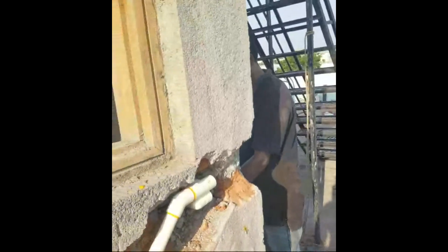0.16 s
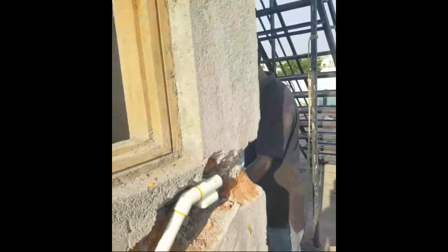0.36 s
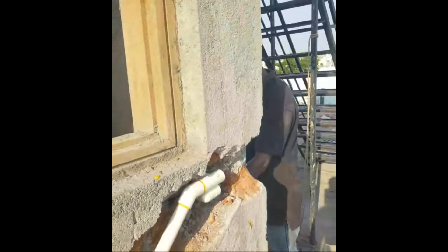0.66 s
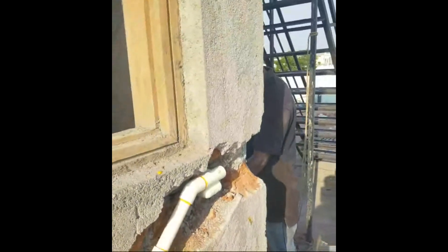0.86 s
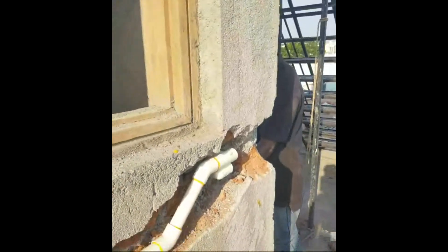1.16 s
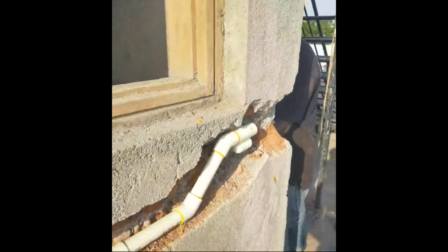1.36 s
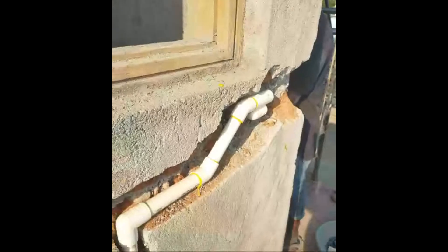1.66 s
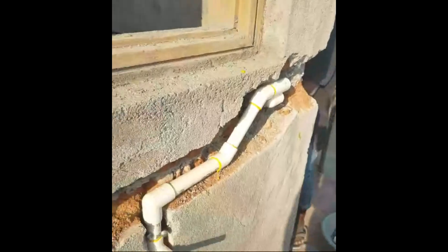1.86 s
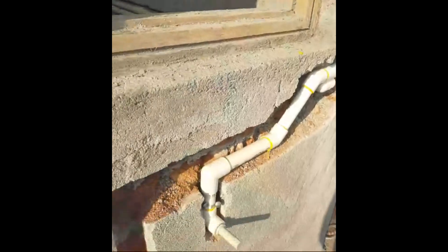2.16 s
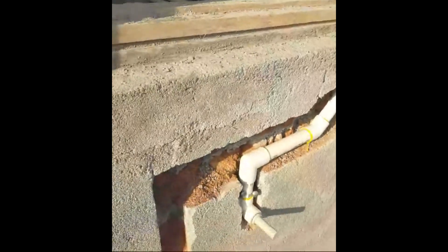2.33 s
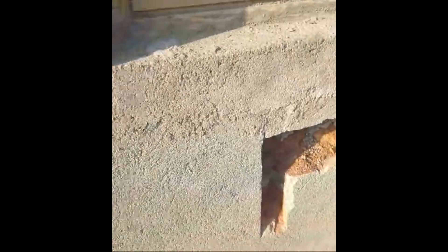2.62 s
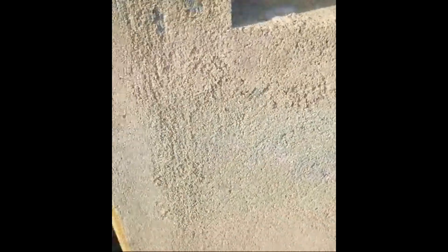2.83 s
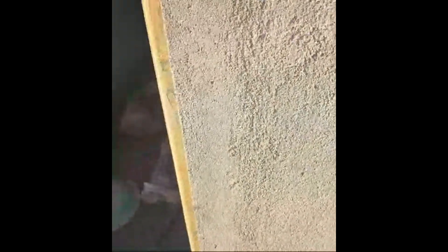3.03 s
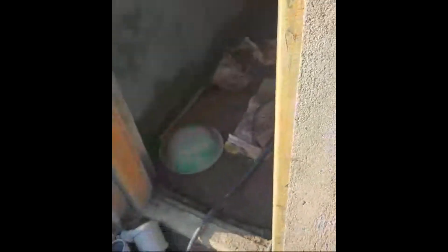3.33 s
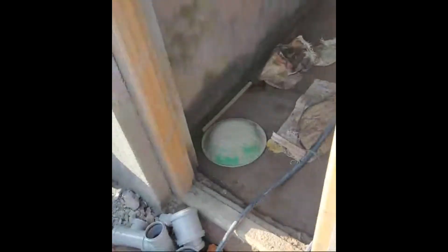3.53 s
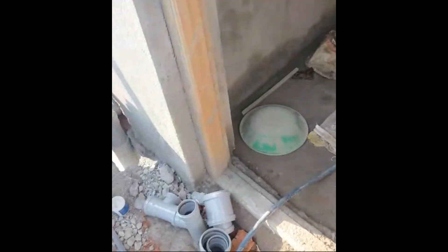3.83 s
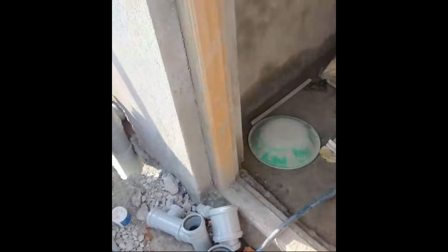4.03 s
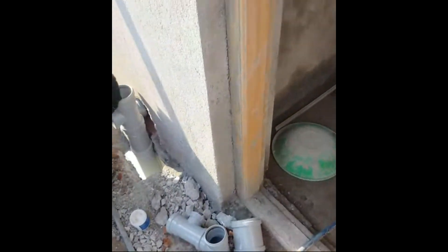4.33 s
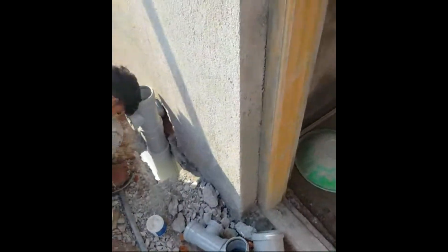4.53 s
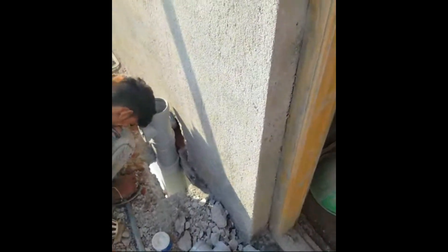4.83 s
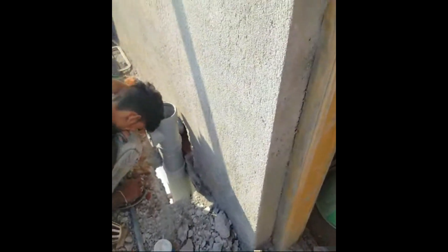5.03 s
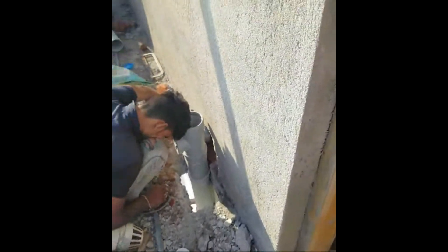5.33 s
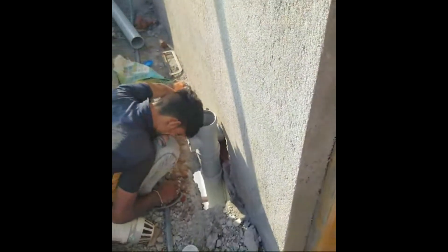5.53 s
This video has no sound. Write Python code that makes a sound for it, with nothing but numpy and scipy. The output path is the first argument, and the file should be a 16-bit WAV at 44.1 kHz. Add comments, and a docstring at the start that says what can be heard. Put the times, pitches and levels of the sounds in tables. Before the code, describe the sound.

Harsh rapid chiselling on a masonry wall snaps off into a dying motor whirr, returns as a long loud burst, then drops to faint clattering with metallic tinks.

```python
"""A power chipping hammer on a plastered brick wall, one microphone, close walls: about 44 blows a second.
Blows and random bounces drive noise and ringing modes of steel and brick; a biting chisel lets the blows stand
out, a skating one blurs them into rattle and crunch. A short burst dies into a fading whirr of noise and hum,
a long loud burst opens with a thin high note, then the hammering is heard much more quietly with bright steel tinks.
Faint site air and two narrow noise tones lie behind."""
import sys
import numpy as np
from scipy import signal
from scipy.fft import rfft, irfft, next_fast_len
from scipy.io import wavfile
from scipy.ndimage import uniform_filter1d

SR = 44100
rng = np.random.default_rng(int(sys.argv[2]) if len(sys.argv) > 2 else 0)


def wav_record(signal):
    """Record a signal, one row per channel, as 16-bit PCM in the file named by sys.argv[1]."""
    frames = np.transpose(np.atleast_2d(signal))
    bounded = np.clip(frames, -1, 1)
    # unit amplitude maps onto the largest positive 16-bit level
    quanta = np.round(bounded * 32767).astype(np.int16)
    wavfile.write(sys.argv[1], SR, quanta)


def makeup_ratio(level_db):
    """Linear amplitude ratio for a level in decibels (20 dB per factor of ten)."""
    decades = np.asarray(level_db, float) / 20
    return 10 ** decades


N = 250389

# Hammering as heard in the short burst, the long burst and the quiet stretch;
# each [t/s, overall level/dB, wall's answer/dB]
STRETCHES = [
    [(0.0, -24, -22), (0.016, -27.5, -8.5), (0.06, -23.5, -16), (0.106, -31, -10), (0.236, -37.5, -9),
     (0.27, -55.5, 1)],
    [(1.452, -62, -10), (1.462, -46, -16), (1.49, -37, -17), (1.515, -33, -18), (1.525, -28, -19),
     (1.575, -27, -16), (1.61, -30, -16), (1.645, -29, -12), (1.66, -23.5, -14), (1.84, -24, -12),
     (1.95, -27, -10.5), (2.0, -24.5, -13.5), (2.13, -21, -11.5), (2.2, -23.5, -10), (2.3, -22, -10),
     (2.45, -25.5, -8.5), (2.55, -23.5, -9), (2.65, -22, -10), (2.69, -24, -5), (2.73, -21, -11),
     (2.79, -24.5, -6), (2.89, -23.5, -10), (3.06, -27, -2), (3.17, -24.5, -2.5), (3.198, -22, -6),
     (3.258, -43, 12), (3.34, -44, 5), (3.4, -45.5, 3.5)],
    [(3.47, -47.5, 3), (3.52, -43, 0), (3.65, -43.5, 1), (3.82, -43.5, 2), (3.96, -45, 1), (4.06, -43, 0),
     (4.15, -39.5, -2), (4.27, -45, 0.5), (4.52, -46.5, -2), (4.59, -50, 2.5), (4.67, -48.5, 1),
     (4.69, -44, -2), (4.9, -44.5, -3), (5.04, -47, -1), (5.2, -55, 3), (5.24, -49, -2), (5.262, -50, -5),
     (5.272, -41, -7), (5.33, -37.5, -12.5), (5.38, -44.5, -1.5), (5.52, -44.5, -1.5), (5.68, -45.5, -2.5)],
]
# Moments when the chisel bites: [t of the clearest blow/s, added bite 0-1, half length/s]
BITES = [(0.054, 0.19, 0.092), (1.632, 0.42, 0.24), (2.102, .45, 0.12), (2.29, .25, .05),
         (2.585, 0.33, 0.12), (2.776, 0.23, 0.044), (3.044, 0.54, 0.059), (3.148, 0.18, 0.088),
         (3.605, 0.56, 0.092), (3.761, 0.18, 0.11), (4.085, 0.5, 0.078), (4.321, 0.08, .08),
         (5.294, 0.18, 0.077)]
# Each part against the overall level: (level/dB, share of the wall's answer, extra level in the first burst/dB)
PARTS = dict(steel=(-0.83, 0.02, 0.1), ring=(-7.5, 0.02, 2), chips=(-4.0, 0.17, 3.6),
         plaster=(-3.5, 0.57, 3.6), wall=(-3.0, 1.07, -5.5), thud=(-3.5, 0.87, 0.1),
         hollow=(-1.0, 0.51, -1.5), air=(-29.5, -0.079, -2.0))
# One part swells or sinks for a moment: [t/s, half length/s, level change/dB, part]
SWELLS = [(1.47, .05, -6, "thud"), (1.52, .02, 6, "air"), (1.582, .04, 4.5, "thud"),
          (1.45, .04, 5, "plaster"), (1.46, .04, 3, "air"), (1.47, .05, 5, "chips"),
          (1.66, .08, 3.5, "air"), (1.7, 0.074, 1.5, "steel"), (1.78, 0.037, 1.5, "chips"),
          (2.196, 0.052, 3, "air"), (2.3, 0.065, 0, "ring"), (2.33, .08, -3, "air"),
          (2.587, 0.032, -3, "ring"), (2.598, .08, 1, "air"), (2.8, .1, -5, "air"),
          (3.026, 0.073, -1.5, "chips"), (3.11, 0.1, 2, "plaster"), (3.1, .06, -3, "wall"),
          (3.197, 0.043, 5, "ring"), (3.28, .08, 5, "air"), (3.33, .07, 3, "thud"), (3.4, .1, 2, "wall"),
          (3.52, .08, -5, "thud"), (3.63, .1, 5.5, "wall"), (3.53, .03, 5, "air"), (3.73, .05, 3, "chips"),
          (3.81, .03, 6, "air"), (3.98, 0.035, 10, "ring"), (4.01, .015, 6, "air"), (4.06, .05, 6, "thud"),
          (4.12, .05, 4, "air"), (4.2, .1, 3, "wall"), (4.505, .12, -1, "plaster"),
          (4.634, 0.023, 1.5, "thud"), (4.7, .05, 6, "air"), (4.89, .03, 4, "air"), (5.18, .015, 5, "thud"),
          (5.08, .08, -4, "air"), (5.17, .04, -5, "air"), (5.25, .02, 10, "air"), (5.29, .04, 6, "air"),
          (5.304, 0.063, -7, "chips"), (5.343, 0.024, 9.5, "thud")]
# Bright steel touches: [t/s, peak level/dB, f/Hz]
TINKS = [(3.59, -36.5, 8300), (3.608, -28.5, 7900), (3.613, -34, 6200), (3.633, -38, 8300),
         (5.245, -39, 6600), (5.268, -26, 6530), (5.281, -36, 6540), (5.292, -27, 6600),
         (5.309, -25.5, 6750), (5.317, -25, 6560), (5.33, -27.5, 6600)]
# Thin high note as the long burst starts: (t/s, length/s, level/dB, f/Hz, width/Hz)
START_NOTE = (1.452, .14, -46, 10700, 150)

# Noise colours of the hammering, relative density: [f/Hz, level per Hz/dB]
STEEL_COLOUR = [(3700, -29), (4200, -11.5), (5200, -4), (6000, -3.5), (6600, -1.5), (7350, -3), (7900, -12),
                (8250, -6.5), (8800, -8.5), (10400, -16.5), (11000, -19), (11900, -23), (12100, -43.5)]
PLASTER_COLOUR = [(950, -22), (1120, 0.5), (1450, 0), (1780, -1.5), (2050, -0.5), (2700, -14.5)]
CHIPS_COLOUR = [(1750, -28.5), (2300, -3), (2500, -0.5), (2850, -1.5), (3300, 0), (4100, -4.5), (4900, -19)]
WALL_COLOUR = [(540, -26), (640, -6), (750, 3), (900, -1), (990, 3), (1070, -2.5), (1200, -29.5)]
AIR_COLOUR = [(11800, -29), (12100, -3.5), (15400, -6), (15650, -41)]
# Two low colours, the hollower first burst and then the rest, each [f/Hz, level per Hz/dB]
THUD_COLOURS = [
    [(18, -77), (30, -45.5), (130, -28), (222, -24), (377, -4), (459, -0.5), (582, -2), (700, -27),
     (910, -49.5), (1540, -120)],
    [(18, -67), (30, -56), (92, -28), (192, -6.5), (246, -6), (273, -4), (323, -0.5), (545, -1), (629, -5),
     (680, -5), (880, -45), (1500, -120)],
]
# Modes of the steel chisel and of the brick wall: [f/Hz, relative level/dB, t60/s]
CHISEL_MODES = [(4700, -7.5, 0.017), (5740, -3, 0.011), (6200, -5.5, 0.027), (6530, -6, 0.027),
                (6620, -5.5, 0.028), (7100, -10.5, 0.024), (8300, -7.5, 0.022), (10550, -20, 0.026)]
BRICK_MODES = [(294, -9, 0.21), (340.8, -11, 0.23), (369, -13.5, 0.36), (467.2, -6, 0.24),
               (532, -11.5, 0.31), (773, -5, .1), (857, 0.5, 0.068), (990, -12.5, 0.019), (1830, -7, 0.15)]

# Colour of the whirr's noise, relative density: [f/Hz, level per Hz/dB]
WHIRR_COLOUR = [(40, -20.5), (150, -19.5), (260, -7.5), (460, -10), (700, -9.5), (850, -1.5), (1900, -6),
                (2400, 0.5), (2900, -3), (4500, -9.5), (6200, -4), (7400, -6), (7900, -15), (8500, -12),
                (11900, -31), (12200, -34), (15500, -37)]
# Wavering hum of the whirr: [t/s, f/Hz, level/dB]
HUM = [(0.05, 140, -71), (0.366, 128, -76), (0.53, 115, -76), (0.808, 126, -84), (0.906, 107.5, -87),
       (1.0, 120, -97)]
# Steady narrow tones: [f/Hz, width/Hz, level/dB]
FAINT_TONES = [(875, 8, -89.5), (2420, 90, -87.5)]
# Colour of the faint air of the site, relative density: [f/Hz, level per Hz/dB]
SITE_COLOUR = [(30, -0.5), (130, 1.5), (450, -14.5), (860, -7.5), (2500, -5.5), (6900, -6.5), (12000, -23),
               (15500, -26.5)]


def noise():
    """White noise, the raw material of every rushing or crunching sound."""
    return rng.standard_normal(N)


def rms_one(x):
    """Scale to rms 1."""
    return x / np.sqrt(np.mean(x ** 2) + 1e-20)


def in_time(rows):
    """Columns of a table, interpolated sample by sample over its first column, t/s."""
    s, *columns = np.transpose(rows)
    return [np.interp(np.arange(N) / SR, s, column) for column in columns]


def drift(rate_hz):
    """Slow chance of rms 1: random knots, 60 a second, smoothed by a one-pole lowpass at rate_hz."""
    knots = rng.standard_normal(int(N / SR * 60) + 2)
    pole = np.exp(-2 * np.pi * rate_hz / 60)
    smooth = rms_one(signal.lfilter([1], [1, -pole], knots))
    return np.interp(np.arange(N) / SR * 60, np.arange(len(knots)), smooth)


def coloured(x, spectrum, patchy_db, count):
    """Shape by a spectrum, then let each of count overlapping bands wander in level on its own."""
    hz, level_db = np.transpose(spectrum)
    size = next_fast_len(N)
    f = np.maximum(np.arange(size // 2 + 1) * SR / size, 1)
    shaped = rfft(x, size) * makeup_ratio(np.interp(np.log(f), np.log(hz), level_db, -90, -90))
    place = np.interp(f, [hz[0], hz[-1]], [0, count - 1])
    total = np.zeros(N)
    for k in range(count):
        band = irfft(shaped * np.maximum(1 - abs(place - k), 0), size)[:N]
        total += band * makeup_ratio(patchy_db * drift(8.2))
    return rms_one(total)


def ring(push, hz, t60_s):
    """A two-pole resonance: a click or noise sets one mode ringing, 60 dB down after t60_s."""
    radius, turn = makeup_ratio(-60 / (t60_s * SR)), 2 * np.pi * hz / SR
    return signal.lfilter([0, np.sin(turn)], [1, -2 * radius * np.cos(turn), radius ** 2], push + 1e-18)


def narrow_tone(hz, width_hz):
    """Noise through one resonance makes an unsteady tone; its width sets the decay time."""
    return rms_one(ring(noise(), hz, 2.2 / width_hz))


def site_air():
    """The faint air of the site is quiet noise with a wide spectrum."""
    return makeup_ratio(-82.5) * coloured(noise(), SITE_COLOUR, patchy_db=-1.0, count=4)


def faint_tones():
    """Two resonances driven by noise stay throughout."""
    return sum(makeup_ratio(level_db) * narrow_tone(hz, width_hz) for hz, width_hz, level_db in FAINT_TONES)


def whirr():
    """Smooth noise holds, then sinks away with a hum that wavers in pitch and level."""
    t = np.arange(N) / SR
    sinks_s, knee_s = 0.39, 0.97
    level_db = -49.5 - 23.5 * np.clip(t - sinks_s, 0, knee_s - sinks_s)  # falls 23.5 dB a second
    level_db -= 30 * np.maximum(t - knee_s, 0)  # then 30 dB a second
    level_db -= 4.5 * np.clip((t - knee_s) / 0.03, 0, 1)  # with a step down at the knee
    body = makeup_ratio(level_db) * coloured(noise(), WHIRR_COLOUR, patchy_db=1.2, count=30)
    hum_hz, hum_db = in_time(HUM)
    turns = np.cumsum(hum_hz * (1 + 0.03 * drift(12.0))) / SR
    hum = makeup_ratio(hum_db + 3.0 * drift(8.0)) * np.sqrt(2) * np.sin(2 * np.pi * turns)
    return body + hum * (t < HUM[-1][0])


def start_ring():
    """A narrow high note sounds briefly as the long burst comes in: noise through one resonance."""
    s, length_s, level_db, hz, width_hz = START_NOTE
    shape = np.interp(np.arange(N) / SR, [s, s + 0.3 * length_s, s + length_s], [0, 1, 0])
    return makeup_ratio(level_db) * shape * narrow_tone(hz, width_hz)


def tinks():
    """A few milliseconds of scraping contact excite one bright steel mode."""
    out, touch = np.zeros(N), np.hanning(260)
    for s, level_db, hz in TINKS:
        scrape = np.zeros(N)
        scrape[round(s * SR):][:len(touch)] = touch * rng.standard_normal(len(touch))
        note = ring(scrape, hz, t60_s=0.039)
        out += makeup_ratio(level_db) * note / abs(note).max()
    return out


def walls():
    """Near walls smear sound in time by a short diffuse tail, without colouring it; returns the smearing."""
    t60_s, tail_db, lead = 0.34, -3, 512  # lead in samples leaves room for what precedes the peak
    t = np.arange(2 ** 14) / SR
    tail = rng.standard_normal(len(t)) * makeup_ratio(-60 * t / t60_s) * (t > 0.004)
    response = makeup_ratio(tail_db) * tail / np.linalg.norm(tail) + (t == 0)
    spectrum = rfft(response)
    even = np.roll(irfft(spectrum / abs(spectrum)), lead)  # keep only the phase
    return lambda x: rms_one(signal.fftconvolve(x, even)[lead:N + lead])


def loudness():
    """Gain of every part as heard: overall level plus its share of the wall's answer, steeply down in the gap."""
    t = np.arange(N) / SR
    early = t < 1
    first, long, quiet = STRETCHES
    level_db, answer_db = np.where(early, in_time(first), in_time(long + quiet))
    gap_s = np.where(early, t - first[-1][0], long[0][0] - t)
    level_db = level_db - 800 * np.maximum(gap_s, 0)  # dB a second
    levels = {}
    for part, (part_db, share, first_db) in PARTS.items():
        levels[part] = level_db + part_db + share * answer_db + first_db * early
    for s, half_s, swell_db, part in SWELLS:
        width_s = half_s * np.where(t < s, 0.4, 1)  # the rise is quicker than the fall
        levels[part] = levels[part] + swell_db * np.exp(-((t - s) / width_s) ** 2)
    # the air hiss overstates quick changes of the overall level, and wanders
    quick_db = np.clip(level_db - uniform_filter1d(level_db, size=SR // 2), -6, 6)
    levels["air"] = levels["air"] + 0.4 * np.minimum(quick_db, 1.5) + 1.2 * drift(16.0)
    levels["hollow"] = levels["hollow"] - 46 * t  # fades 46 dB a second
    return {part: makeup_ratio(part_db) for part, part_db in levels.items()}, early


def contacts(spread_db, jitter_s, rattle_per_s, least_rattle_db):
    """Piston blows, uneven in time and strength, and random bounces of the loose chisel between them."""
    blows_per_s, skating_bite, skating_jitter_s = 44, 0.25, 0.002
    s, strength, half_s = np.transpose(BITES)
    # a whole number of blows between bites puts one blow on each bite
    number = np.cumsum(np.round(np.diff(s, prepend=-1, append=7) * blows_per_s))
    when = np.interp(np.arange(number[-1]), np.r_[0, number], np.r_[-1, s, 7])
    when = when[(when > 0) & (when < N / SR)]
    nearness = np.exp(-((when[:, None] - s) / half_s) ** 2)
    bite = skating_bite + (strength * nearness).sum(axis=1)
    time_chance, strength_chance = rng.standard_normal((2, len(when)))
    loose_s = jitter_s + skating_jitter_s * skating_bite / bite  # a biting chisel keeps better time
    at = np.clip((when + loose_s * time_chance) * SR, 0, N - 1).astype(int)
    blows = np.zeros(N)
    blows[at] = bite * makeup_ratio(spread_db * strength_chance)
    sizes = makeup_ratio(least_rattle_db + 4.5 * np.minimum(rng.exponential(1, N), 3.5))
    return blows, sizes * (rng.random(N) < rattle_per_s / SR)


def crunch(blows, rattle, rise_s, fall_s, blow_gain, steady, crack):
    """Noise flares at each blow and ticks at each bounce over a steady grind; every contact also cracks."""
    t = np.arange(int(0.06 * SR)) / SR
    flare = np.exp(-t / fall_s) - np.exp(-t / np.minimum(rise_s, 0.9 * fall_s))  # rise stays the shorter
    tick = np.exp(-t / 0.00022)
    envelope = steady + blow_gain * signal.fftconvolve(blows, flare / flare.max())[:N]
    envelope += signal.fftconvolve(rattle, tick)[:N]
    return noise() * envelope + crack * (blows + rattle)


def struck(hits, modes, spread_db):
    """Every contact strikes each mode with a new strength and sign."""
    total = np.zeros(N)
    for hz, level_db, t60_s in modes:
        strikes = hits * makeup_ratio(spread_db * noise()) * rng.choice([-1, 1], N)
        total += makeup_ratio(level_db) * ring(strikes, hz, t60_s)
    return rms_one(total)


def hammer():
    """Steel, plaster and wall answer the same contacts, which run on throughout; the air hiss is smooth."""
    gain, early = loudness()
    blows, rattle = contacts(spread_db=1.0, jitter_s=0.0015, rattle_per_s=320, least_rattle_db=-15.0)
    hits, smear = blows + rattle, walls()

    # crunch arguments: rise/s, fall/s, blow gain, steady grind
    steel = crunch(blows, rattle, 0.0046, 0.0049, 1.84, 0.71, crack=9.0)
    steel = smear(coloured(steel, STEEL_COLOUR, patchy_db=2.5, count=20))
    plaster = crunch(blows, rattle, 0.0012, 0.0015, 3.0, 0.99, crack=6.2)
    plaster = smear(coloured(plaster, PLASTER_COLOUR, patchy_db=1.0, count=5))
    chips = crunch(blows, rattle, 0.0028, 0.0021, 1.88, 0.74, crack=9.9)
    chips = smear(coloured(chips, CHIPS_COLOUR, patchy_db=2.0, count=8))

    highpass = signal.butter(2, 4500, "high", fs=SR, output="sos")
    chisel = smear(signal.sosfilt(highpass, struck(hits, CHISEL_MODES, spread_db=1.0)))
    chisel = makeup_ratio(2 * drift(4.7)) * chisel  # wanders by 2 dB

    wall = crunch(blows, 0.3 * rattle, 0.0014, 0.0027, 2.45, 1.0, crack=6.0)
    wall = coloured(wall, WALL_COLOUR, patchy_db=-0.5, count=3)
    high_modes = [mode for mode in BRICK_MODES if mode[0] > 620]
    wall = smear(wall + makeup_ratio(-13.0) * struck(hits, high_modes, spread_db=-3.0))

    push = crunch(blows, 0.24 * rattle, 0.0027, 0.0087, 1.54, 0.99, crack=6.0)
    hollow, thud = [coloured(push, colour, patchy_db=2.5, count=5) for colour in THUD_COLOURS]
    low_modes = [mode for mode in BRICK_MODES if mode[0] < 620]
    thud = smear(thud + makeup_ratio(-6.5) * struck(hits, low_modes, spread_db=3.5))
    low = np.where(early, gain["hollow"] * smear(hollow), gain["thud"] * thud)

    air = coloured(noise(), AIR_COLOUR, patchy_db=0.8, count=2)
    metal = gain["steel"] * steel + gain["ring"] * chisel
    masonry = gain["plaster"] * plaster + gain["chips"] * chips + gain["wall"] * wall
    return metal + masonry + low + gain["air"] * air


def scene():
    """One microphone: both channels alike."""
    background = site_air() + faint_tones() + whirr()
    return np.tile(background + start_ring() + tinks() + hammer(), (2, 1))


def top_cut(x):
    """Nothing passes above the cut-off."""
    return signal.sosfilt(signal.butter(12, 15590, fs=SR, output="sos"), x)


def record(dry):
    """The microphone cuts the deep bass below 60 Hz, and peaks are rounded off."""
    highpass = signal.butter(3, 60, "high", fs=SR, output="sos")
    cut = signal.sosfilt(highpass, dry)
    peak_limit = 0.48  # of full scale
    mix = peak_limit * np.tanh(cut / peak_limit)
    return top_cut(mix)


dry = scene()
out = record(dry)
wav_record(out)
```